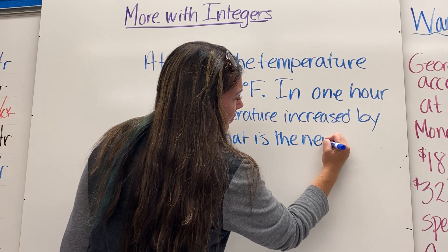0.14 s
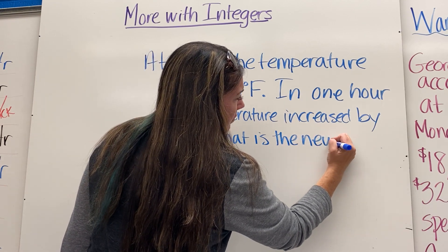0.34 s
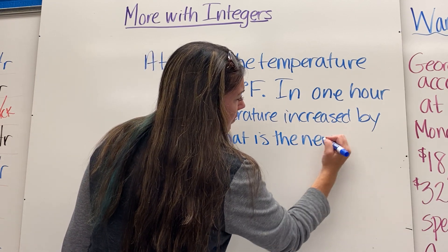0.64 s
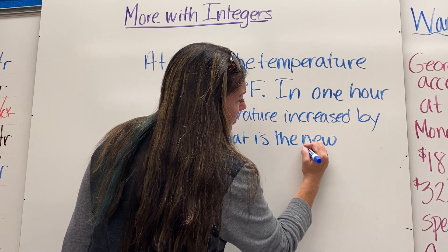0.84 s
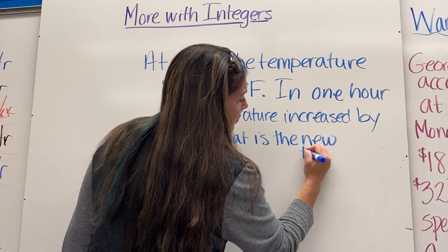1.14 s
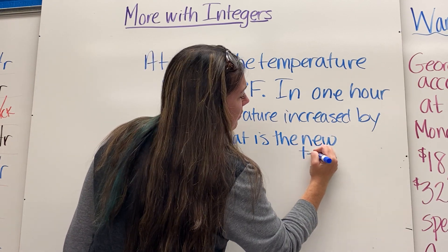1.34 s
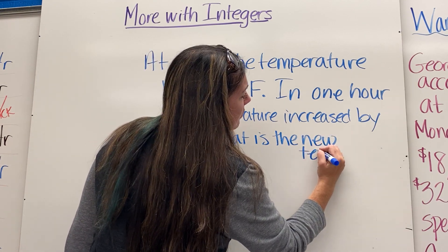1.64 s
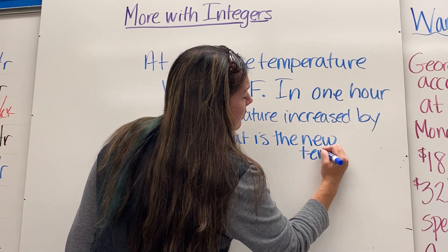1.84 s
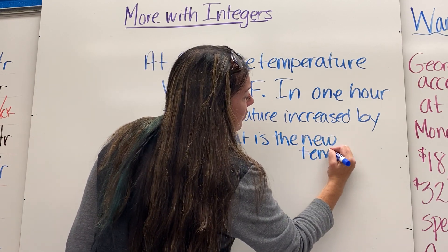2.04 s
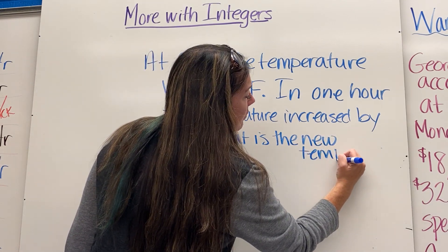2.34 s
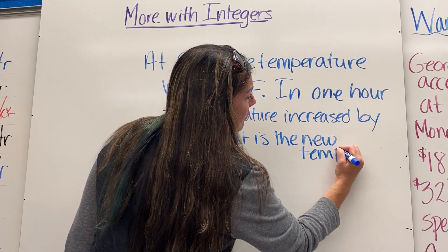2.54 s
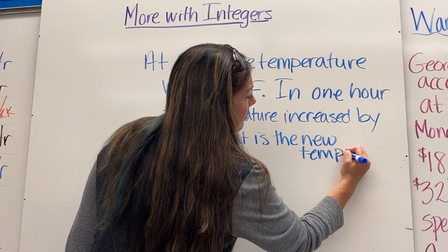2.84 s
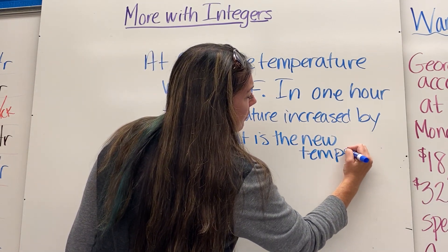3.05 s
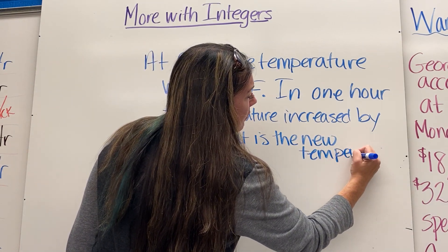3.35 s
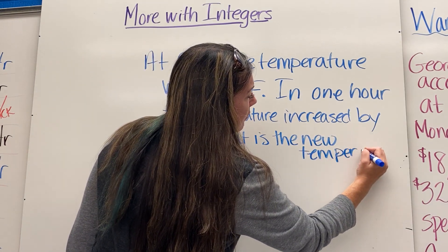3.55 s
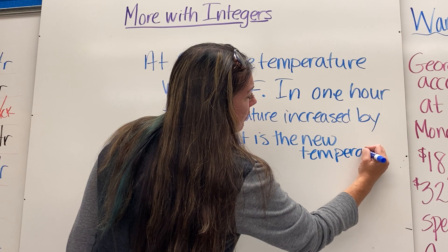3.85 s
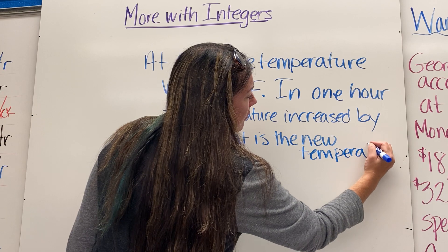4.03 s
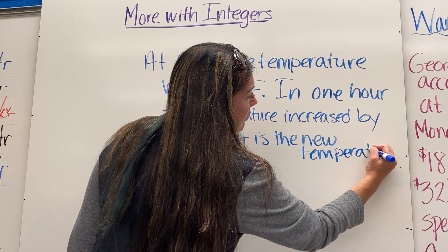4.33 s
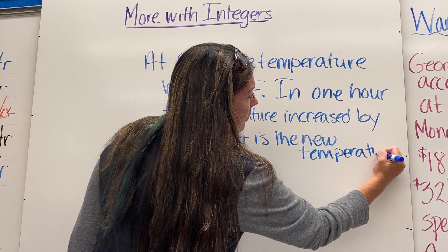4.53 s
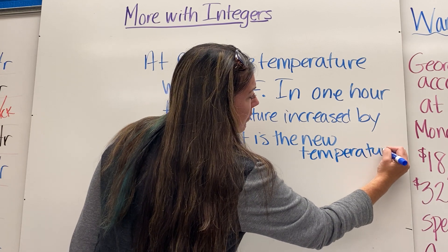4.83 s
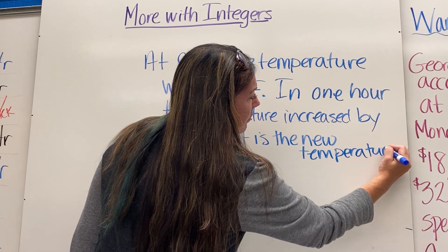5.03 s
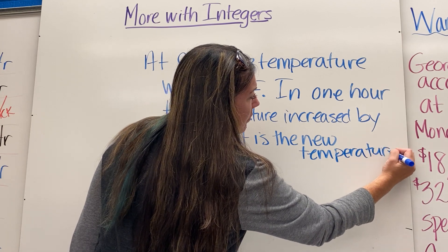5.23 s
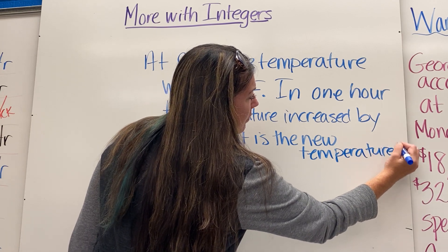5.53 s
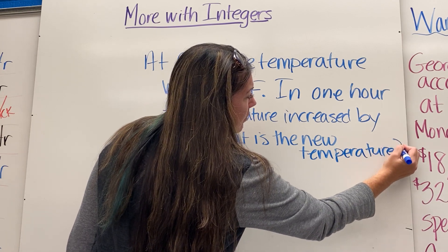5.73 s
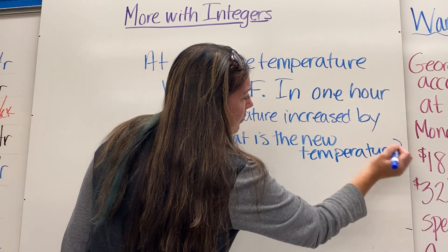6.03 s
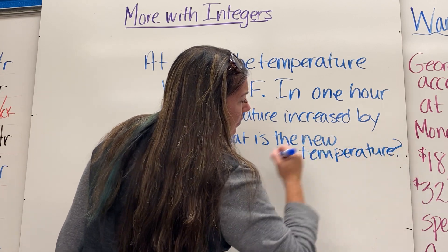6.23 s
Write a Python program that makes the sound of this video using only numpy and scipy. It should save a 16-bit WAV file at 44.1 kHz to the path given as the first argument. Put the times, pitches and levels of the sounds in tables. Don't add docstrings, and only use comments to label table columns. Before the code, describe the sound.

In a quiet classroom, a dry-erase marker writes on a hollow board with short, airy, high hisses in irregular bursts. Soft thuds come as tip and hand touch the panel, strongest near the end. A low ventilation hum wavers underneath throughout, with a faint clock clicking across the room about once a second. Close handheld stereo microphone, little echo.

```python
import sys
import numpy as np
from scipy import signal
from scipy.fft import rfft, irfft, next_fast_len
from scipy.io import wavfile
from scipy.ndimage import uniform_filter1d

SR = 44100
rng = np.random.default_rng(int(sys.argv[2]) if len(sys.argv) > 2 else 0)


def volts(x):
    e = np.asarray(x, float) / 20
    return 10 ** e


def materialize(psi):
    bounded = np.clip(np.atleast_2d(psi).T, -1, 1)
    quanta = np.round(bounded * 32767).astype(np.int16)
    wavfile.write(sys.argv[1], SR, quanta)


N = 281358
SIZE = next_fast_len(N, True)
HZ = np.arange(SIZE // 2 + 1) * SR / SIZE + 1e-3
ROOM_T60_S = 0.34


def rms_one(x):
    return x / np.sqrt(np.mean(x ** 2) + 1e-20)


def in_time(rows):
    s, *columns = np.transpose(rows)
    return [np.interp(np.arange(N) / SR, s, column) for column in columns]


def at_hz(points):
    hz, values = np.transpose(points)
    return np.interp(np.log(HZ), np.log(hz), values)


def drift(rate):
    r = np.exp(-80 * np.pi * rate / SR)
    noise = rng.standard_normal(N // 40 + 2002)
    slow = signal.lfilter([1], [1, -2 * r, r * r], noise)[2000:]
    return np.interp(np.arange(N) / 40, np.arange(len(slow)), rms_one(slow))


def coloured(shared, spectrum, alike):
    alike = np.clip(alike, 0, 1)
    common = np.sqrt(alike) * rfft(rms_one(shared), SIZE)
    own = np.sqrt(1 - alike) * rfft(rng.standard_normal((2, SIZE)))
    return rms_one(irfft((common + own) * volts(at_hz(spectrum)), SIZE)[:, :N])


def resonance(x, hz, width_hz):
    r = np.exp(-np.pi * width_hz / SR)
    poles = [1, -2 * r * np.cos(2 * np.pi * hz / SR), r * r]
    return signal.lfilter([(1 - r * r) / 2, 0, (r * r - 1) / 2], poles, x)


def struck(times, peak_db, modes, spread_db, soft_hz):
    at, out = (np.asarray(times) * SR).astype(int), np.zeros(N)
    luck_db = rng.normal(0, spread_db, (len(at), len(modes)))
    for k, (hz, level_db, t60) in enumerate(modes):
        clicks = np.full(N, 1e-18)
        clicks[at] = volts(peak_db + level_db + luck_db[:, k])
        r, w = volts(-60 / (t60 * SR)), 2 * np.pi * hz / SR
        ring = signal.lfilter([0, np.sin(w)], [1, -2 * r * np.cos(w), r * r], clicks)
        out += (-1) ** k * ring
    soften = signal.butter(1, min(soft_hz, .45 * SR), fs=SR, output="sos")
    return signal.sosfilt(soften, out)


def in_room(x, wet_db):
    t = np.arange(SR // 2) / SR
    tail = rng.standard_normal((2, len(t))) * volts(-60 * t / ROOM_T60_S) * (t > .006)
    tail /= np.sqrt(np.sum(tail ** 2, axis=1, keepdims=True))
    return x + volts(wet_db) * signal.fftconvolve(x[None], tail, axes=1)[:, :N]


def patchy(x, centres, patch_db, rate):
    out, spectrum = 0, rfft(x, SIZE)
    for centre in centres:
        mask = np.cos(np.pi / 2 * np.clip((HZ - centre) / 800, -1, 1)) ** 2
        out = out + volts(patch_db * drift(rate)) * irfft(spectrum * mask, SIZE)[:, :N]
    return rms_one(out)


def stroke_swell(strokes, level_db, stretch, steep, tail_db):
    t, power = np.arange(N) / SR, np.zeros(N)
    for (middle, half, *_), db in zip(strokes, level_db):
        near = slice(max(0, int((middle - .2) * SR)), int((middle + .2) * SR))
        from_middle = np.abs((t[near] - middle) / (half * stretch))
        power[near] += volts(2 * db - 12.2 * from_middle ** steep)
    hold = volts(-120 / (ROOM_T60_S * SR))
    held = signal.lfilter([1 - hold], [1, -hold], power + 1e-20)
    return np.sqrt(power + volts(2 * tail_db) * held)


# middle in seconds, half length in
# seconds, pressure as felt hiss in dB, slant as barrel hiss above felt in dB.
STROKES = [(0.01, 0.059, -78, 0), (0.509, 0.04, -77.5, 0.8), (.993, .034, -83, -1.5), (1.57, 0.053, -79.5, 2),
           (1.785, .028, -81, 2.5), (1.896, 0.055, -81.5, 1), (1.993, .028, -82, 2),
           (2.091, 0.035, -77, -2.5), (2.174, 0.026, -80.5, 0), (2.402, 0.037, -77, -2.5),
           (3.135, .05, -81.5, 1), (3.478, 0.037, -78.5, -2), (3.725, .051, -82.5, 4.5),
           (3.947, 0.034, -83.5, -1.5), (4.184, 0.032, -80.5, -1), (4.407, .026, -79.5, -.7),
           (4.616, 0.041, -82, -0.5), (5.097, .042, -80.5, -1), (5.31, .028, -79, -2.5),
           (5.419, 0.043, -77, -3.3), (5.495, 0.032, -81.5, -4), (5.72, .038, -81, 2),
           (5.825, .029, -81, -3.5),
           (0.221, .034, -85, 3.5), (0.307, .036, -86, 5.5), (0.418, .031, -86, 1.5), (1.209, 0.023, -90, 8),
         (1.427, 0.039, -85.5, 5.5), (2.496, .019, -90.3, -5), (2.667, 0.037, -89, 7.5),
         (2.75, 0.035, -92, 11), (2.826, 0.021, -88.5, 7), (3.001, 0.04, -90, 9), (3.354, 0.027, -84, 3.5),
         (3.823, 0.027, -83.5, 5), (4.527, .03, -84, 0.5), (4.726, .03, -86, -1.5),
         (4.937, 0.032, -85.5, -4)]
# frequency in Hz, level in dB per Hz.
FELT = [(6500, -35), (7800, -2), (9000, -1.5), (10000, -1.5), (11000, 2.5), (12000, -7.5), (12800, -15.5),
        (13500, -38)]
# frequency in Hz, level in dB per Hz.
FIBRES = [(12500, -23), (13500, -2), (14200, -3.5), (15000, 1.5), (15800, -3.5)]
# frequency in Hz, level in dB per Hz.
BARREL = [(1800, -24), (3000, -1), (4000, -3.5), (5000, 1), (6200, 3), (7500, -1.5), (8800, -9.5)]


def marker():
    strokes = STROKES
    _, _, felt_db, slant_db = np.transpose(strokes)
    sizes = volts(3.2 * np.minimum(rng.exponential(1, N), 5)) * rng.choice([-1, 1], N)
    grains = sizes * (rng.random(N) < 9000 / SR)
    centres = np.arange(1600, 14500, 800)
    felt = patchy(coloured(grains, FELT, alike=.84), centres[5:], patch_db=3.2, rate=9)
    fine = coloured(grains, FIBRES, alike=.9)
    barrel = patchy(coloured(grains, BARREL, alike=.75), centres[:10], patch_db=3.5, rate=10)

    slow_pass = signal.butter(2, 250, fs=SR, output="sos")
    narrow = rms_one(signal.sosfilt(slow_pass, rng.standard_normal(N)))
    whistle_hz = 5850 + 596 * drift(3.3)
    whistle = volts(-6) * narrow * np.sin(2 * np.pi * np.cumsum(whistle_hz) / SR)

    mean_pressure_db = -82
    fine_db = -83.5 + .4 * (felt_db - mean_pressure_db)
    felt_swell = stroke_swell(strokes, felt_db + 1.5, stretch=0.9, steep=2.7, tail_db=-19.5)
    fine_swell = stroke_swell(strokes, fine_db, stretch=1.0, steep=3.5, tail_db=-37)
    barrel_swell = stroke_swell(strokes, felt_db + slant_db, stretch=1.14, steep=3.0, tail_db=-7.5)
    return felt_swell * felt + fine_swell * fine + barrel_swell * (barrel + whistle)


def duct_tone(level_db, modes, even):
    air, tone = rng.standard_normal(N + SR), 0
    for hz, width_hz, db in modes:
        ring = resonance(resonance(air, hz, width_hz), hz, width_hz)
        tone = tone + volts(db) * rms_one(ring)
    swell = np.sqrt(uniform_filter1d(uniform_filter1d(tone ** 2, size=4400), size=4400))
    return volts(level_db) * rms_one((tone / swell ** even)[SR:])


# time in seconds, level in dB.
MAIN_SWELL = [(0.0, -41), (0.03, -48.5), (0.55, -42), (1.05, -45), (1.15, -35), (1.31, -49.5), (1.35, -41),
              (2.42, -43.5), (2.47, -37.5), (2.68, -52.5), (2.74, -43.5), (3.89, -46.5), (3.96, -38.5),
              (4.53, -44.5), (5.24, -41.5), (5.28, -47.5), (6.18, -43), (6.38, -48)]
# time in seconds, level in dB.
BRANCH_SWELL = [(0.0, -49), (0.07, -69.5), (0.12, -47), (0.69, -58), (1.4, -48.5), (1.49, -73),
                (1.54, -50.5), (3.29, -56.5), (3.61, -50.5), (4.18, -50.5), (4.25, -68), (4.35, -44.5),
                (4.6, -66.5), (4.76, -50), (5.81, -53), (6.09, -43), (6.18, -54), (6.38, -53.5)]
# frequency in Hz, rms level in dB.
MAINS = [(360, -72.5), (480, -79.5), (660, -86), (720, -98), (840, -82)]
# frequency in Hz, level in dB per Hz.
RUMBLE = [(17, -29.5), (34, -6), (48, 3), (72, -3.5), (90, -1.5), (165, -10.5), (230, -8.5), (350, -16),
          (460, -25), (500, -20.5), (560, -26), (800, -33), (1000, -70)]
# frequency in Hz, level in dB per Hz.
AIR = [(600, -21), (800, -0.5), (1000, 4), (1300, -0.5), (1600, -4.5), (1900, -9), (2600, -12),
       (3500, -18.5), (5500, -24.5), (8000, -26), (10000, -34.5), (12300, -37),
       (12700, -50), (16000, -55)]
# frequency in Hz, likeness from 0 to 1.
LIKENESS = [(30, 1), (340, 0.96), (450, 0.07), (700, 0.3), (1000, 0.73), (1500, 0.4), (2100, 0.18),
            (4000, .5), (5000, 0), (8000, 0.1), (11000, 0.8), (12500, 0.1), (16000, 0.5)]


def ventilation():
    (main_db,), (branch_db,) = in_time(MAIN_SWELL), in_time(BRANCH_SWELL)
    main = duct_tone(main_db + 1.47, [(103.53, 17.0, 2.9), (122.1, 20.3, 0.3)], even=0.55)
    branch = duct_tone(branch_db - .6, [(197.77, 11.1, 0)], even=.7)
    breeze = volts(.5 * drift(4))
    t, alike = np.arange(N) / SR, at_hz(LIKENESS)
    hum = sum(volts(db + 4) * np.sin(2 * np.pi * hz * t) for hz, db in MAINS)
    rumble = volts(-48.5) * breeze * coloured(rng.standard_normal(N), RUMBLE, alike)
    hiss = volts(-70) * breeze * coloured(rng.standard_normal(N), AIR, alike)
    return main + branch + hum + rumble + hiss


# time in seconds, peak in dB,
# low thud above the peak in dB, hard edge above the peak in dB.
KNOCKS = [(0.103, -58, 1.5, -3), (0.189, -52, 7, -20), (0.913, -52, 11.5, -14), (1.147, -46.5, 6.5, -11.5),
          (1.342, -46, -3, -11), (1.708, -51.5, 9.5, -21), (2.324, -48.5, -13.5, -20),
          (3.302, -48, 3.5, -3), (3.613, -45.5, -2, 2.5), (4.128, -42, 6.5, 3), (4.88, -50.5, 4, -18),
          (5.234, -49.5, 7.5, -1), (5.286, -68, 0.5, -4), (5.664, -41, -4, -15), (5.676, -41.5, 8, -16),
          (5.71, -64, 4, 4), (5.972, -40, 5.5, -12.5), (6.015, -54, 9, -16), (6.073, -58, -7, -3.5)]
# frequency in Hz, level in dB, time to fall 60 dB in seconds.
THUD = [(187.3, -1, 0.11), (226, -8.5, 0.14), (271.3, -1, 0.078), (314, -3, 0.059)]
# frequency in Hz, level in dB, time to fall 60 dB in seconds.
PANEL = [(356, -1.5, 0.055), (422.4, -8, 0.12), (503, -5.5, 0.098), (574, -12.5, 0.039), (586, -9.5, 0.068)]
# frequency in Hz, level in dB, time to fall 60 dB in seconds.
EDGE = [(660, -14, 0.062), (1310, -20.5, 0.035), (702, -15, 0.071), (1503, -22.5, 0.089),
        (2340, -27.5, 0.013), (3600, -36.5, .008), (6500, -37, .003)]


def panel():
    s, peak_db, thud_db, edge_db = np.transpose(KNOCKS)
    low = struck(s + 0.00493, peak_db + thud_db, THUD, spread_db=3.5, soft_hz=945)
    mid = struck(s + .001, peak_db - .5, PANEL, spread_db=3.5, soft_hz=1505)
    edge = struck(s, peak_db + edge_db, EDGE, spread_db=4.5, soft_hz=9000)
    return in_room(low + mid + edge, wet_db=-4)


# seconds after its start, peak in dB.
GEAR_CONTACTS = [
    (.0005, -54.5),
    (.026, -61),
    (.913, -58.5),
    (.9655, -57),
    (.9886, -54.5),
]
# frequency in Hz, level in dB, time to fall 60 dB in seconds.
CLOCK = [(1250, -9, .012), (1700, -11, .008), (2100, -9, .012), (2700, -10, .008), (3300, -8, .01),
         (4100, -12, .008), (5100, -19, .01), (5650, -19, .014)]
# frequency in Hz, level in dB per Hz.
GEARS = [(700, -10.5), (1200, 5), (2000, 2), (3000, -4), (4000, -13), (5500, -14.5), (7000, -29)]


def clock():
    starts = .798 + 2.0 * np.arange(3)
    after, peak_db = np.transpose(GEAR_CONTACTS)
    contacts = (starts[:, None] + after).ravel()
    contact_db = np.tile(peak_db, len(starts)) - 5.5
    gears = struck(contacts, contact_db, CLOCK, spread_db=2.5, soft_hz=12000)
    rotor = struck(starts - .023, -61.5, [(1180, 0, .05)], spread_db=.5, soft_hz=3000)
    clicks = in_room(gears + rotor, wet_db=2.5)

    t, swell = np.arange(N) / SR, np.zeros(N)
    whir_after_s, whir_db, loss_db_per_s = (.004, 0.95), -69, 1
    for step_s in (starts[:, None] + whir_after_s).ravel():
        rise, fall = (t - step_s) / 0.044, (step_s - t) / 0.097
        swell += volts(whir_db - loss_db_per_s * step_s) * np.exp(np.where(t < step_s, rise, fall))
    whir = swell * coloured(rng.standard_normal(N), GEARS, alike=0.27)
    return (clicks + whir) * volts(np.array([[-1.5], [1.5]]))


# start in seconds, length in seconds, rms level in dB.
SQUEAKS = [
    (6.194, .075, -92.5),
    (6.312, 0.063, -91),
]


def squeaks():
    t, out = np.arange(N) / SR, np.zeros(N)
    start_hz, rise_hz_per_s, width_hz = 14300, 20000, 150
    slow_pass = signal.butter(2, width_hz, fs=SR, output="sos")
    rough = rms_one(signal.sosfilt(slow_pass, rng.standard_normal(N)))
    for start, length, db in SQUEAKS:
        since = np.clip(t - start, 0, length)
        phase = 2 * np.pi * (start_hz * since + rise_hz_per_s * since ** 2 / 2)
        swell = np.sin(np.pi * (since / length) ** 1.5)
        out += volts(db + 3) * swell * rough * np.sin(phase)
    return out


def scene():
    return marker() + ventilation() + panel() + clock() + squeaks()


def roll_off(x):
    return signal.sosfilt(signal.butter(12, 16920, fs=SR, output="sos"), x)


# frequency in Hz, lead in radians.
LEFT_LEAD = [(0, .3), (120, .65), (500, .5), (900, -2.4), (1400, -6.2), (2000, -5.5), (2500, -7.8),
             (4000, -6.6), (6500, -7.1), (8300, -3.2), (11000, 0), (11700, .1), (13500, 3.1), (15300, 6.3)]
# frequency in Hz, difference in dB.
LEFT_OVER_RIGHT = [(60, 2.5), (200, -1), (400, -0.5), (1300, 5.5), (2400, -.5), (5000, -4.5), (8000, -1),
                   (16000, 2.5)]


def record(dry):
    size, edge = next_fast_len(N + 8192), 4096
    hz = np.arange(size // 2 + 1) * SR / size
    lead = np.interp(hz, *np.transpose(LEFT_LEAD))
    louder_db = np.interp(hz, HZ, at_hz(LEFT_OVER_RIGHT))
    tilt = volts(louder_db / 2) * np.exp(.5j * lead)
    run_in = np.pad(dry, [(0, 0), (edge, size - N - edge)], "reflect")
    spectrum = rfft(run_in) * [tilt, 1 / tilt] * (hz < 15750)
    ports = irfft(spectrum, size)[:, edge:edge + N]
    return roll_off(ports)


dry = scene()
out = record(dry)
materialize(out)
```